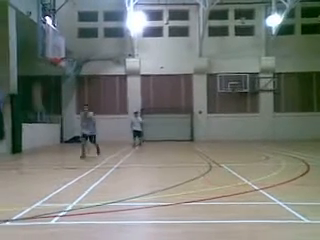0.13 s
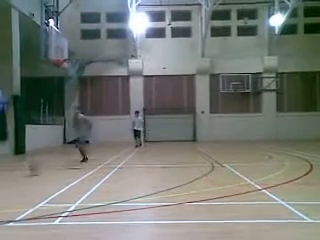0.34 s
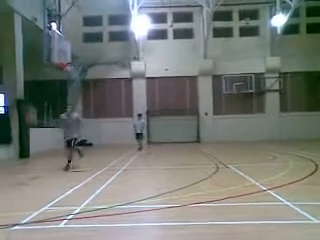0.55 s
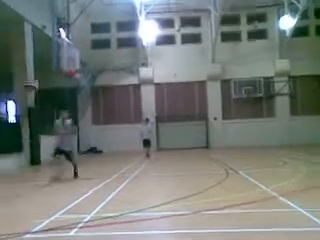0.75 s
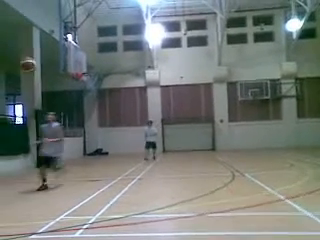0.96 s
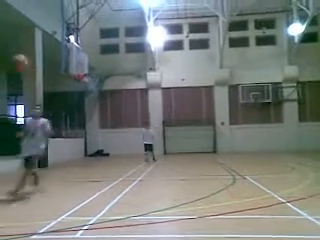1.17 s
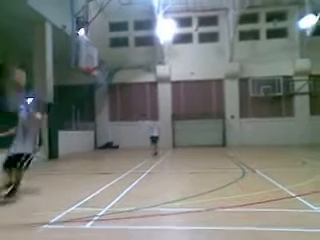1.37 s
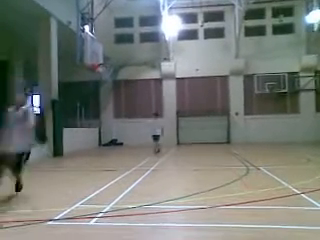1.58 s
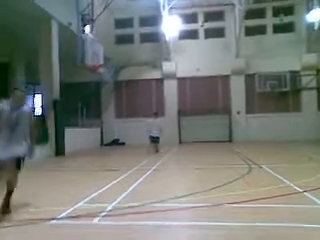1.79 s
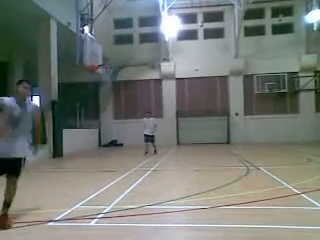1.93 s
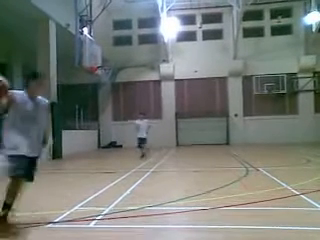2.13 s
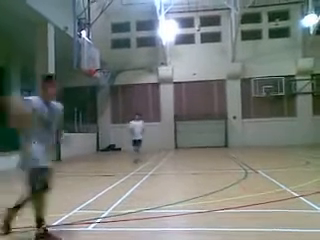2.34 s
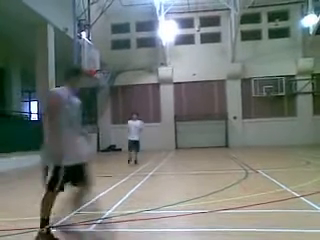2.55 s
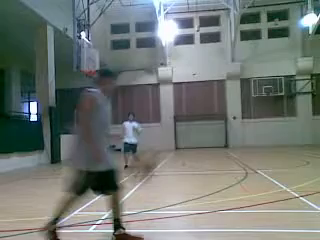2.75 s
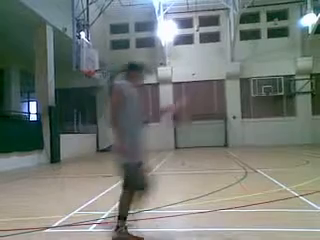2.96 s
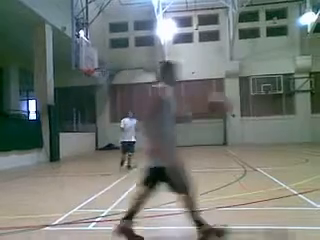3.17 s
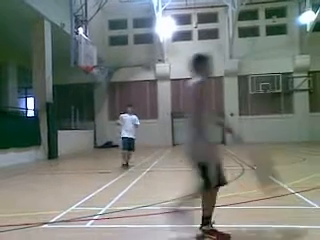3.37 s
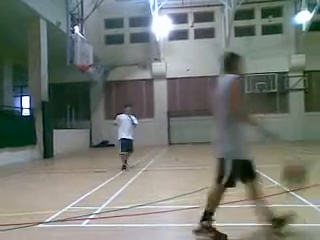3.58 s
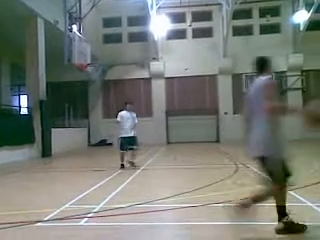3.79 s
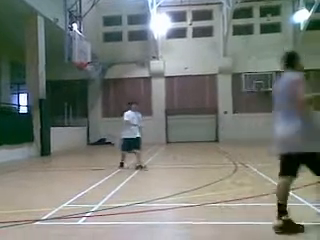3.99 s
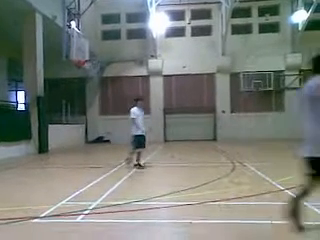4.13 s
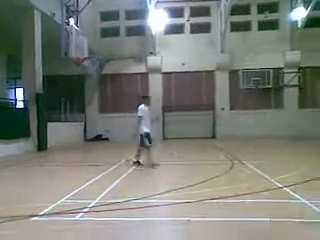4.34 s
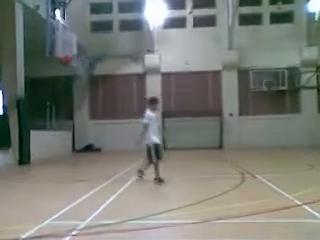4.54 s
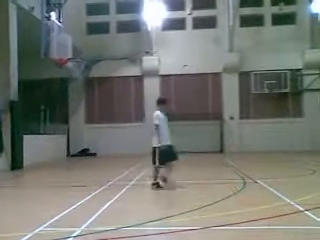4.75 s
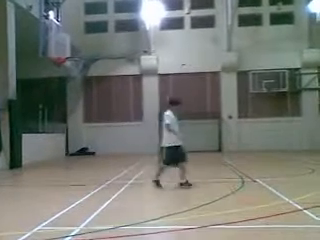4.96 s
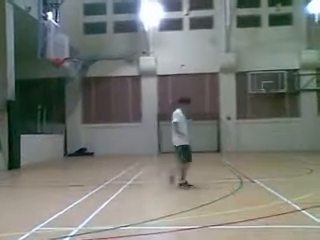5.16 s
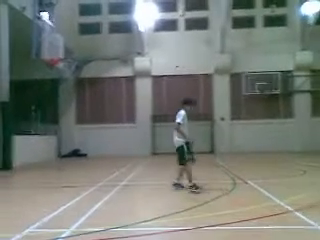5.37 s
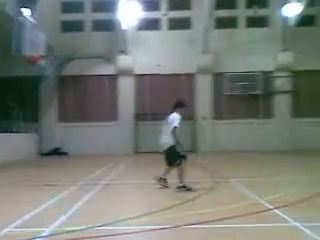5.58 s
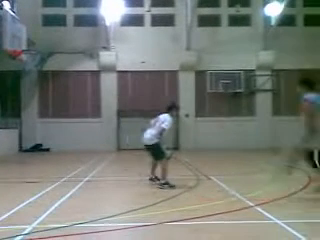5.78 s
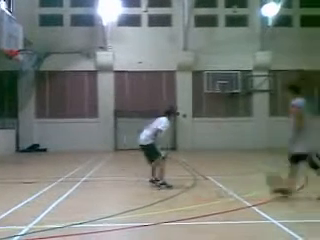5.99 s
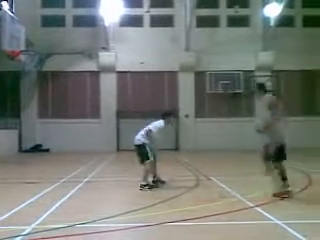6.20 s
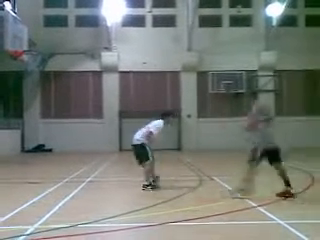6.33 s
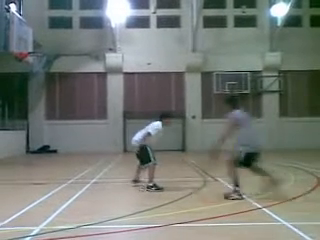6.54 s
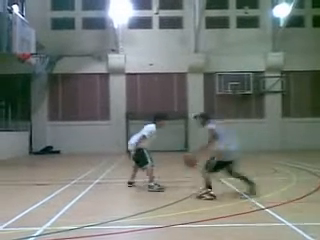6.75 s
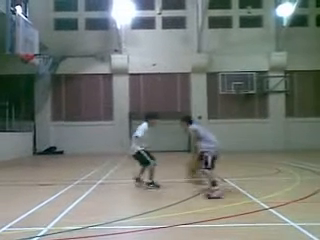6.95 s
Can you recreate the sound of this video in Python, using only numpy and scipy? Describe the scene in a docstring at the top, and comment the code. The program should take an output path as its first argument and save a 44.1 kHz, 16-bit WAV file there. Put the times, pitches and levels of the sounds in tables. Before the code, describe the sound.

A large bare gym with a steady low ventilation rumble and soft rush of air, heard from a courtside microphone. A faint scuff and step at 0.3-0.4 s lead to a loud basketball bounce at 0.46: bright rubber slap, short hollow ring, deep thump, then wall echo and long hall wash. Light hand touches come at 1.0 and 1.35, a strong smack at 1.69, and a bounce at 1.78. A tight cluster of tiny high shoe squeaks chirps at 2.1. Bounces follow at 2.7, 3.55, 4.47, 5.38 and 5.95, with muffled footfalls between them. Small hollow knocks sound at 4.26 and around 5.03, near a faint squeak and soft hand touch. Squeaks return at 6.3; the last bounce at 6.75 is duller and more distant, with a brief ringing chirp, followed by rapid tiny squeaks, a step and a clearer knock at 6.84 as the hall rings on.

```python
"""Seven seconds of basketball in a large, echoing gym, over a steady rumble of filtered-noise ventilation.
A step and a scuff lead to the first of eight bounces: a rubber slap, a ringing skin and a deep thump, then walls
and hall. Hands smack the ball from 1 s with noise over a thud; soles squeak near 2.1 s as gliding stick-slip tones.
Bounces and muffled steps go on, small hollow knocks join from 4.3 s, and hands and a faint squeak return at 5 s.
Chirps cluster from 6.3 s around the last bounce; every source but air and knocks is answered by a noise-built hall."""
import sys
import numpy as np
from scipy import signal
from scipy.fft import rfft, irfft, next_fast_len
from scipy.io import wavfile
from scipy.ndimage import uniform_filter1d, minimum_filter1d

SR = 44100
rng = np.random.default_rng(int(sys.argv[2]) if len(sys.argv) > 2 else 0)


def generate_wav(signal):
    """Clip the signal to [-1, 1] and save it as 16-bit WAV at the path in sys.argv[1]."""
    frames = np.transpose(np.atleast_2d(signal))
    scaled = np.clip(frames, -1, 1) * 32767
    pcm = np.round(scaled).astype(np.int16)
    wavfile.write(sys.argv[1], SR, pcm)


N = 309582

# Ball on the floor; levels are relative, distance sets the share of hall and of the end wall's echo:
# (time [s], thump level [dB], slap level [dB], skin ring [dB], distance [m], thump pitch [Hz], thump T60 [s],
#  skin flattening time [s], treble [dB], wall echo lag [s], wall echo level [dB], boards' base pitch [Hz],
#  boards level [dB], upper-middle bite [dB])
BOUNCES = [(0.4584, 0.5, -2.5, 2.5, 7.54, 100, 0.046, 0.00096, -2.5, 0.0124, -7, 181, -23, -3.5),
           (1.7812, -0.5, -4, 2.5, 6.5, 100.5, 0.029, 0.00085, 0, 0.016, -7.5, 200, -28, 2),
           (2.7063, -2, -4, -3.5, 3.17, 85.7, 0.046, 0.0012, 1.5, 0.019, -17, 191, -21, 0),
           (3.556, -4.5, -7, 0, 4.5, 85, 0.04, 0.001, 1.5, 0.014, -23, 167.5, -28, 3.5),
           (4.4723, 0.5, -3, -1, 3.56, 101, 0.022, 0.0011, -3, 0.032, -23, 150.4, -25, 1.5),
           (5.3780, -5, -8, 3, 6.2, 94.4, 0.067, 0.00158, -2.5, 0.028, -15, 193.4, -27, -4.5),
           (5.955, -5.5, -7, 1.5, 5.85, 93.4, 0.045, 0.0012, -2, 0.029, -12.5, 188, -25, 7),
           (6.7546, -7, -7.5, 2, 10.2, 93, 0.066, 0.0014, -13, 0.023, -10.5, 178.5, -28.5, -6)]
# Modes of the ball's skin and the air inside: (pitch [Hz], T60 [s], level [dB])
BALL_MODES = [(243, 0.056, -17.5), (341, 0.07, -26), (619, 0.18, -24), (700, 0.048, -17.5),
              (857, 0.074, -17), (1088, 0.21, -23.5), (1750, 0.014, -15.5), (2606, 0.02, -16),
              (5560, 0.0031, -5), (7740, 0.0047, -7.5)]
# Crack of rubber on the boards: (frequency [Hz], level [dB])
CRACK_SPECTRUM = [(60, -5.5), (130, -8.5), (210, 7.5), (320, 3.5), (460, 2), (650, 3), (1050, 1.5),
                  (1400, 0.5), (2700, -1), (3700, -16.5), (5000, -4.5), (6200, 0.5), (8000, -7.5),
                  (11000, -33)]
# Sprung boards under the ball: (multiple of base pitch [ratio], T60 [s], level [dB])
BOARD_MODES = [(0.999, 0.072, 1.5), (1.48, 0.066, -10.5), (1.791, 0.046, -5), (2.45, 0.073, -15)]
# Hands on the ball: (time [s], level [dB], palm share [0 fingertips, 1 flat hand], distance [m])
HANDS = [(1.004, -36, 0, 1.6), (1.026, -24, 0, 2.8), (1.3524, -25, 0.46, 5.2), (1.362, -33, 0.52, 3.4),
         (1.6627, -34, 0.13, 1.5), (1.6854, -11.5, 0.35, 4.6), (5.025, -34.5, 1, 11.4)]
# Smack of a hand or sole: (frequency [Hz], level [dB])
SMACK_SPECTRUM = [(100, -28.5), (250, 11.5), (500, 4), (1000, 4), (1500, -0.5), (2000, 2), (2700, -3.5),
                  (3800, -10.5), (6000, 3.5), (8000, -3), (11000, -28)]
# Footfalls: (time [s], level [dB], treble of the sole [dB])
STEPS = [(0.384, -31, -14), (1.358, -30, -27), (2.49, -28, -24), (3.2, -31, -29), (4.087, -36, -15),
         (5.871, -34.5, -16), (6.834, -27.5, -18)]
# Slipping soles, and at 6.754 s the ball's short ring on the last bounce;
# the partials and rasp are relative to the level, the distance sets the share of hall:
# (time [s], length [s], settled pitch [Hz], starting pitch [share of settled], level [dB], octave [dB],
#  third partial [dB], rasp [dB], distance [m], rms pitch waver [share of pitch])
CHIRPS = [(2.0845, 0.0055, 2870, 0.92, -18, -12, -16, -12, 7.3, 0.012),
          (2.087, 0.014, 3040, 0.99, -25, 7, -1.5, -7, 15, 0.031),
          (2.097, 0.0093, 3064, 1.05, -20.5, 1, -8, -24, 9.1, .02),
          (2.1046, 0.0078, 3164, 1.11, -24, 7, -12, -17, 8.2, 0.035),
          (2.1024, 0.0065, 2770, 0.92, -16.5, -10, -23, -18, 4.8, 0.016),
          (4.945, 0.011, 4170, 0.9, -39, -12, -30, -16, 3.9, .01),
          (4.9705, 0.0034, 3220, 1.05, -38.5, 4, -32, -22, 4.5, .01),
          (6.2727, 0.011, 2694, 1, -20.5, -18, -22, -33, 6.2, 0.043),
          (6.279, 0.016, 2750, 1.04, -33.5, 3, -13.5, -23, 7.9, 0.038),
          (6.2935, 0.0073, 3090, 0.78, -13.5, -22, -37, -39, 5.3, 0.018),
          (6.301, 0.0035, 2990, 0.95, -19, -9, -44, -40, 2.6, 0.025),
          (6.301, 0.008, 3215, 0.9, -25.5, 4.5, -40, -35, 8.2, 0.016),
          (6.736, 0.0039, 2710, 1, -33.5, 13, 6, 11.5, 5, 0.035),
          (6.739, 0.0043, 2870, 1.04, -25, 23, -1, 2, 4.5, 0.017),
          (6.743, 0.011, 2830, 0.97, -29, 23.5, -22, -2, 5.5, 0.012),
          (6.754, 0.0066, 2590, 0.993, -11, -12, -30, -31, 3.9, 0.0089),
          (6.8133, 0.0044, 3170, 0.95, -34.5, 20, 18, 4, 4.1, 0.031),
          (6.8169, 0.0032, 2427, 1.1, -31, 32, 29, 16, 5.3, 0.025),
          (6.8175, 0.0072, 2964, 1.2, -32.5, 21.5, 10.5, 10, 5.5, 0.027),
          (6.825, 0.0039, 2760, 1.1, -36, 19, -4, -4, 5, 0.013),
          (6.829, 0.006, 2860, 0.83, -36, 16, -3, -10, 7.8, 0.0073),
          (6.8344, 0.0065, 3120, 0.84, -31, 22.5, 0, 1, 8.8, 0.023),
          (6.841, 0.004, 2760, 1, -36.5, 19, 23.5, 5, 6, 0.018),
          (6.8425, 0.0041, 3120, 0.98, -35.5, 33, -4, 3, 5.1, 0.016)]
# Rasp in the chirps: (frequency [Hz], level [dB])
RASP_SPECTRUM = [(1500, -11), (2700, -16), (3300, -20.5), (3900, -1.5), (4400, -10), (5000, 3), (6300, 0),
                 (7100, -23), (7900, 4.5), (8700, -14), (10500, -43)]
# Neighbouring tones, as of the ribs of a tread, heard through the hall: (pitch [share of chirp pitch], level [dB])
RIBS = [(.95, -11.5), (1.05, -10.5)]
# Slow unrest of a chirp's pitch and loudness: (frequency [Hz], level [dB])
UNREST_SPECTRUM = [(300, 22.0), (1500, -46.0), (5000, -72)]
# Short hisses: soles brushing the floor, and at 5.986 s a wall's brief answer to a bounce:
# (time [s], length [s], level [dB])
HISSES = [(0.292, 0.085, -47.5), (1.435, 0.15, -50.5), (5.047, 0.066, -47.5), (5.876, 0.029, -49.5),
          (5.986, 0.0067, -38)]
# Spectrum of the short hisses: (frequency [Hz], level [dB])
HISS_SPECTRUM = [(1000, -26), (2700, 8.5), (3700, -8.5), (5800, 2), (8000, -1), (11000, -46)]
# Small hollow knocks: (time [s], pitch [Hz], level [dB])
KNOCKS = [(4.2596, 400, -21.5), (5.0265, 670, -23), (5.046, 480, -28), (6.836, 670, -13)]
# Reverberation time of the hall: (frequency [Hz], T60 [s])
HALL_T60 = [(60, 1.2), (150, 1.34), (400, 1.5), (1000, 2), (2800, 3), (6000, 2.5), (10000, 1.62)]
# Colour of the hall: (frequency [Hz], level [dB])
HALL_COLOUR = [(30, 1.5), (80, 5.5), (165, 3.5), (400, 7.5), (1100, 7), (2000, 6.5), (3000, 3), (4000, 5),
               (6000, 0), (7400, -1), (9200, 0.5), (10200, -73.5)]
# Ventilation spectrum: (frequency [Hz], relative level per Hz [dB])
AIR_SPECTRUM = [(20, -3.5), (45, 1.5), (100, 2), (200, -5), (450, -11), (900, -12), (1400, -14.5),
                (2100, -16.5), (2750, -17.5), (3700, -29.5), (4500, -30.5), (5900, -26.5), (7800, -35.5),
                (10000, -72)]
# Slow drift of the ventilation level: (frequency [Hz], level [dB])
AIR_DRIFT = [(2, 0), (8, -20), (40, -90)]

NEAR_M = 6.26  # at this distance the hall gets the source at unchanged level
THUMP_DB, THUMP_HALL_DB = -3, -0.5  # thump against slap, and its share in the hall
REBOUND_S = 0.01004  # the thump crests as the ball leaves the floor, this long after first touch
FAR_S, FAR_DB = .084, -15  # the end wall sends the thump back this late
BEND_S, BEND_HZ = 0.000496, 1026  # travel time of the crack through the boards at this pitch
TIPS_BRIGHT_DB, PALM_BRIGHT_DB = 4, -26.5  # the fingertips tick
TIPS_THUD_DB, PALM_THUD_DB, FULL_THUD_SHARE = -8, 3, 0.49  # the palm thuds, fully from this share on
HAND_HZ, HAND_T60_S = 116.5, 0.024  # thud pitch, smack decay
STEP_HZ, STEP_T60_S = 109, 0.09  # thud pitch, smack decay
STEP_THUD_DB, STEP_BRIGHT_DB, STEP_HALL_DB = -4.5, -5, -0.5
SETTLE_S = 0.0052  # time constant of a chirp's glide to its settled pitch
FUNDAMENTAL_DB, OVERTONES_DB = -9, 12.5  # the fundamental gives way to the overtones
HISS_BRIGHT_DB = 4.5
KNOCK_T60_S = 0.016
WALLS_FIRST_S, WALLS_LAST_S, WALLS_DB = .025, .14, 13.5  # span and strength of the distinct echoes
AIR_DB = -39.47
TOP_HZ = 10400


def bounces(grain=0.15, contact_t60=0.017, flatten_db=-8.0, ring_db=-8, crack_db=8.5,
            spread_crack_db=15, spread_ring_db=-11, spread_flatten_db=-12, echo_bright_db=-4, boards_hall_db=5):
    """The ball cracks on the floor, its skin rings, the thump follows, the boards shudder, the walls answer."""
    t = clock(.25)
    crack = click(CRACK_SPECTRUM, len(t))
    for (s, weight_db, slap_db, skin_db, metres, hz, t60, flatten, bright_db,
         lag, echo_db, boards_hz, boards_db, bite_db) in BOUNCES:
        # first touch, a crackle of pebbles, and a second slap as the skin flattens
        contact = grain * rng.standard_normal(len(t)) * fade(t, contact_t60)
        contact[0] = 1
        contact[int(flatten * SR)] += undb(flatten_db)

        ring = undb(ring_db + skin_db) * skin(t)
        # a thump crests three quarters of a cycle after it starts
        thump_time = np.maximum(t - REBOUND_S + .75 / hz, 0)
        low = undb(weight_db + THUMP_DB) * thump(thump_time, hz, t60)
        shudder = undb(boards_db) * boards(t, boards_hz)
        body = ring + undb(crack_db) * crack
        slap = signal.fftconvolve(bend(contact), body)[:len(t)]
        slap = bite(undb(slap_db) * brighten(slap, bright_db), bite_db)

        direct = slap + low + shudder
        add(direct, lag, undb(echo_db) * scatter(brighten(slap, echo_bright_db)))
        add(direct, FAR_S, undb(FAR_DB) * metres / NEAR_M * low)

        # the hall gathers all directions, where the broad crack outweighs the ring
        spread = undb(spread_ring_db) * ring + undb(spread_crack_db) * crack
        spread = undb(slap_db) * brighten(spread, bright_db)
        add(spread, flatten, undb(spread_flatten_db) * spread)
        to_hall = bite(spread, bite_db / 2) + undb(THUMP_HALL_DB) * low + undb(boards_hall_db) * shudder
        yield s, direct, metres / NEAR_M * to_hall


def skin(t, detune=0.024):
    """The ball rings in decaying modes; every blow squashes it, and so tunes it, a little differently."""
    tuning = 1 + detune * rng.standard_normal(len(BALL_MODES))
    return sum(undb(db) * np.cos(2 * np.pi * hz * k * t) * fade(t, t60)
               for (hz, t60, db), k in zip(BALL_MODES, tuning))


def thump(t, hz, t60, rise=0.0049):
    """The squashed ball first draws the air in, then it and the floor swing back a few times."""
    swing = -np.sin(2 * np.pi * hz * t)
    onset = 1 - np.exp(-(t / rise) ** 2)
    return swing * onset * fade(np.maximum(t - 1 / hz / 2, 0), t60)  # decays after the first half cycle


def boards(t, hz, load_s=0.0041, scatter=0.027):
    """The floor shudders as the ball's weight builds up on it, a little differently at every bounce."""
    chance = rng.standard_normal((len(BOARD_MODES), 2))
    modes = sum(undb(db) * np.sin(2 * np.pi * (hz * ratio * (1 + scatter * off) * t + turn)) * fade(t, t60)
                for (ratio, t60, db), (off, turn) in zip(BOARD_MODES, chance))
    return modes * (1 - np.exp(-(t / load_s) ** 2))


def bend(x):
    """A blow spreads through the boards as a bending wave, treble first."""
    size = 2 * len(x)
    f = np.fft.rfftfreq(size, 1 / SR)
    # this phase delays each pitch by BEND_S * sqrt(BEND_HZ / f)
    lag = np.exp(-2j * np.pi * 2 * BEND_S * np.sqrt(BEND_HZ * f))
    return irfft(rfft(x, size) * lag, size)[:len(x)]


def bite(x, db, low_hz=2200, high_hz=3100):
    """Lift or lower the upper middle, where a slap is hardest."""
    band = signal.butter(1, (low_hz, high_hz), "bandpass", fs=SR, output="sos")
    return x + (undb(db) - 1) * signal.sosfilt(band, x)


def scatter(x, rough=0.023, t60=0.027):
    """A wall with pillars and fittings returns a sharp echo and a short clatter behind it."""
    t = clock(.1)
    facets = rough * rng.standard_normal(len(t)) * fade(t, t60)
    facets[0] = 1
    return signal.fftconvolve(x, facets)


def hands(ring_db=1, ring_bright_db=-12, grip_t60=.16):
    """Hands on the ball: more palm dulls the smack and deepens the thud; the grip soon stops the ring."""
    texture, t = noise(SMACK_SPECTRUM), clock(.25)
    for s, db, palm, metres in HANDS:
        thud_db = np.interp(palm, [0, FULL_THUD_SHARE], [TIPS_THUD_DB, PALM_THUD_DB])
        bright_db = np.interp(palm, [0, 1], [TIPS_BRIGHT_DB, PALM_BRIGHT_DB])
        hall_db = 20 * np.log10(metres / NEAR_M)
        _, direct, spread = tap(texture, s, db, thud_db, HAND_HZ, bright_db, HAND_T60_S, hall_db)
        ring = undb(db + ring_db) * brighten(skin(t), ring_bright_db, 1600) * fade(t, grip_t60)
        yield s, direct + ring, spread + metres / NEAR_M * ring


def steps(sole_hz=2600):
    """Soles land on the boards; the soft rubber muffles each smack by its own amount."""
    texture = noise(SMACK_SPECTRUM)
    for s, db, sole_db in STEPS:
        sole = brighten(texture, sole_db, sole_hz)
        yield tap(sole, s, db, STEP_THUD_DB, STEP_HZ, STEP_BRIGHT_DB, STEP_T60_S, STEP_HALL_DB)


def tap(texture, s, db, thud_db, hz, bright_db, t60, hall_db, thud_t60=0.02):
    """A soft landing: a noisy smack over a dead thud."""
    t = clock(.25)
    clap = click(SMACK_SPECTRUM, len(t))
    smack = undb(db) * piece(texture, s, len(t)) * fade(t, t60)
    thud = undb(db + thud_db) * thump(t, hz, thud_t60, rise=0.00099)
    # summed over all directions the smack is one even clap of the same energy
    spread = clap * np.linalg.norm(smack) / np.linalg.norm(clap)
    return s, brighten(smack, bright_db) + thud, undb(hall_db) * (brighten(spread, bright_db) + thud)


def chirps(flutter_db=2.0, edge=0.7):
    """Soles stick and slip about 3000 times a second in raspy glides; one chirp is the ball's short ring."""
    texture = noise(RASP_SPECTRUM)
    unrest, grip = noise(UNREST_SPECTRUM), noise(UNREST_SPECTRUM)
    for s, length, settled_hz, start, db, octave_db, third_db, rasp_db, metres, waver in CHIRPS:
        t = clock(length)
        drag = np.exp(-t / SETTLE_S)  # 1 at the start, towards 0 as the pitch settles
        glide = 1 + (start - 1) * drag
        hz = settled_hz * glide * (1 + waver * piece(unrest, s, len(t)))
        phase = 2 * np.pi * np.cumsum(hz) / SR

        low = undb(FUNDAMENTAL_DB * (1 - drag))
        high = undb(-OVERTONES_DB * drag)

        def rib(turn):
            """One tone: a fundamental and its octave."""
            return low * np.sin(turn) + high * undb(octave_db) * np.sin(2 * turn)

        third = high * undb(third_db) * np.sin(3 * phase)
        rasp = undb(rasp_db) * piece(texture, s, len(t))
        flutter = undb(db + flutter_db * piece(grip, s, len(t)))
        swell = flutter * np.sin(np.pi * t / length) ** edge
        chirp = swell * (rib(phase) + third + rasp)
        neighbours = swell * sum(undb(rib_db) * rib(share * phase) for share, rib_db in RIBS)
        yield s, chirp, metres / NEAR_M * (chirp + neighbours)


def hisses(hall_db=1):
    """Shaped noise swells and dies: soles brushing the floor, and once a wall's brief answer to a bounce."""
    texture = brighten(noise(HISS_SPECTRUM), HISS_BRIGHT_DB)
    for s, length, db in HISSES:
        t = clock(length)
        hiss = undb(db) * piece(texture, s, len(t)) * np.sin(np.pi * t / length)
        yield s, hiss, undb(hall_db) * hiss


def knocks():
    """Small hollow knocks, each a few swings that die at once, heard dry without the hall."""
    out = np.zeros(N)
    for s, hz, db in KNOCKS:
        add(out, s, undb(db) * thump(clock(.1), hz, KNOCK_T60_S, rise=0.0027))
    return out


def hall(count=7, level_db=-44, first=0.00093, build=0.0032, early_db=-4.0, early_t60=1.0,
         lumpy=0.37, mixing=0.15, bunch_db=1.5):
    """The gym's answer to one spot: lumpy reflections smooth into a long wash, the upper middle lasting longest."""
    t = clock(2)
    late = np.maximum(t - first, 0)
    f = np.fft.rfftfreq(len(t), 1 / SR)

    # uneven at first, smoother as the reflections mix
    lumps = np.repeat(rng.standard_normal(len(t) // 64 + 1), 64)[:len(t)]
    spread = lumpy * np.exp(-late / mixing)
    rays = rng.standard_normal(len(t)) * np.exp(spread * lumps - spread ** 2)
    # reflections arrive in bunches, about a hundred a second
    knots = np.arange(0, t[-1], .01)
    rays *= undb(bunch_db * np.interp(t, knots, rng.standard_normal(len(knots))))
    # the bare walls and the roof send a few distinct echoes that stand out of the wash
    echo_times = rng.uniform(WALLS_FIRST_S, WALLS_LAST_S, count)
    rays[(SR * echo_times).astype(int)] += undb(WALLS_DB)

    # split into overlapping bands, each with its own decay
    reflections = rfft(rays) * undb(at(HALL_COLOUR, f))
    centres, t60s = np.transpose(HALL_T60)
    tail = sum(irfft(reflections * at(np.c_[centres, band], f), len(t)) * fade(t, t60)
               for band, t60 in zip(np.eye(len(t60s)), t60s))
    onset = 1 - np.exp(-late / build)
    early = 1 + undb(early_db) * fade(late, early_t60)
    return undb(level_db) * tail * onset * early


def ventilation():
    """A steady rumble and rush of air, shaped noise that wavers by half a decibel rms."""
    drift = noise(AIR_DRIFT)
    return noise(AIR_SPECTRUM) * undb(AIR_DB + .5 * drift)


def undb(db):
    """Decibels to gain."""
    return 10 ** (np.asarray(db) / 20)


def at(points, hz):
    """Read (Hz, value) points on a log-frequency axis."""
    f, value = np.transpose(points)
    return np.interp(np.log(np.maximum(hz, 1)), np.log(f), value)


def clock(length):
    """Sample times over a length in seconds."""
    return np.arange(int(length * SR)) / SR


def noise(points):
    """Noise of rms 1 with the given spectrum, as long as the scene."""
    size = next_fast_len(N, True)
    spectrum = rfft(rng.standard_normal(size)) * undb(at(points, np.fft.rfftfreq(size, 1 / SR)))
    x = irfft(spectrum, size)[:N]
    return x / x.std()


def click(points, size):
    """The sharpest causal (minimum-phase) pulse that has the given spectrum."""
    cepstrum = irfft(np.log(undb(at(points, np.fft.rfftfreq(2 * size, 1 / SR)))))[:size]
    cepstrum[1:] *= 2
    return irfft(np.exp(rfft(cepstrum, 2 * size)))[:size]


def piece(x, s, size):
    """A stretch of the looped texture x that starts at time s."""
    return x.take(int(s * SR) + np.arange(size), mode="wrap")


def add(track, s, x):
    """Mix x into the track at time s."""
    i = int(s * SR)
    track[i:i + len(x)] += x[:len(track) - i]


def fade(t, t60):
    """Exponential decay, 60 dB in t60."""
    return np.exp(-np.log(1000) * t / t60)


def brighten(x, db, corner_hz=3500):
    """Treble shelf: harder contact is brighter."""
    low = signal.sosfilt(signal.butter(1, corner_hz, fs=SR, output="sos"), x)
    return low + undb(db) * (x - low)


def scene(count=8):
    """Actions sound directly and through the hall, whose answers rotate; air and knocks stay dry."""
    out = ventilation()
    answers = [hall() for _ in range(count)]
    actions = [*bounces(), *hands(), *steps(), *hisses(), *chirps()]
    for k, (s, direct, spread) in enumerate(actions):
        add(out, s, direct)
        add(out, s, signal.fftconvolve(spread, answers[k % count]))
    return (out + knocks())[None]


def record(dry, ceiling=0.53):
    """A fast limiter holds down the peaks, and a steep low-pass cuts the top."""
    gain = minimum_filter1d(ceiling / np.maximum(np.abs(dry), ceiling), size=45)  # about 1 ms
    limited = dry * uniform_filter1d(gain, size=45)
    return signal.sosfilt(signal.ellip(8, .2, 70, TOP_HZ, fs=SR, output="sos"), limited)


dry = scene()
out = record(dry)
generate_wav(out)
```